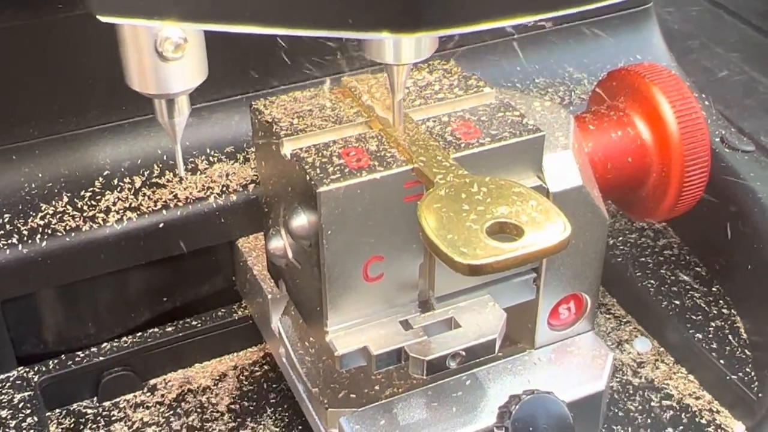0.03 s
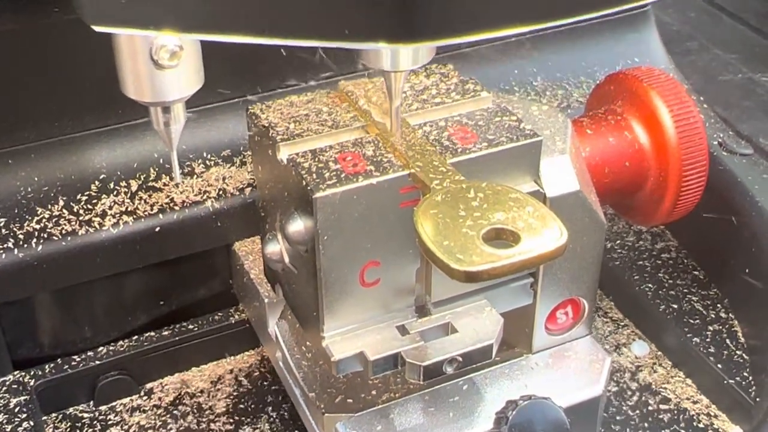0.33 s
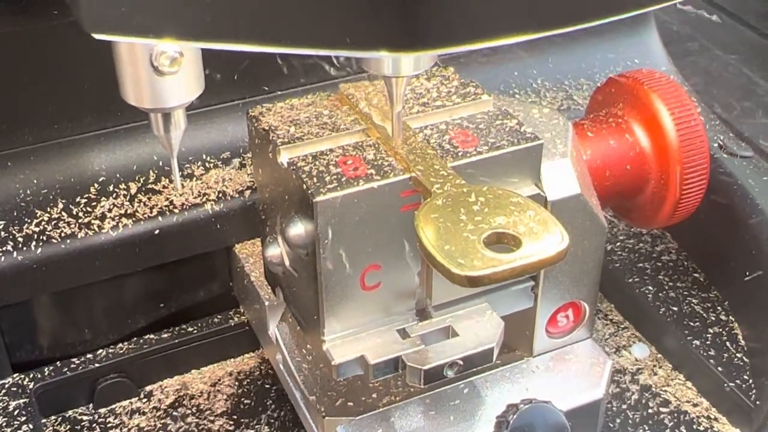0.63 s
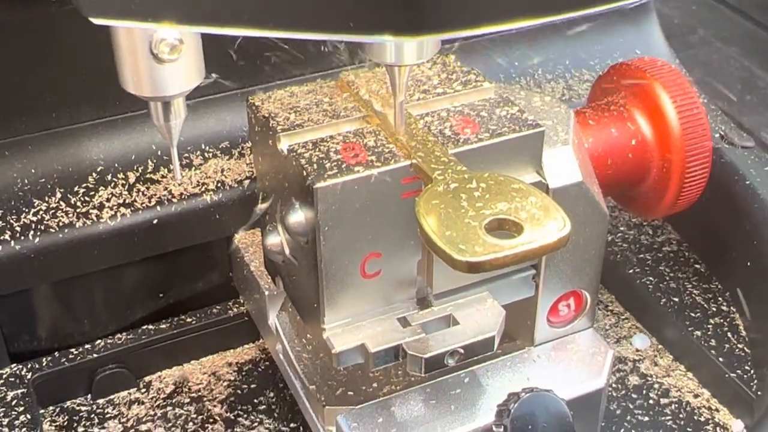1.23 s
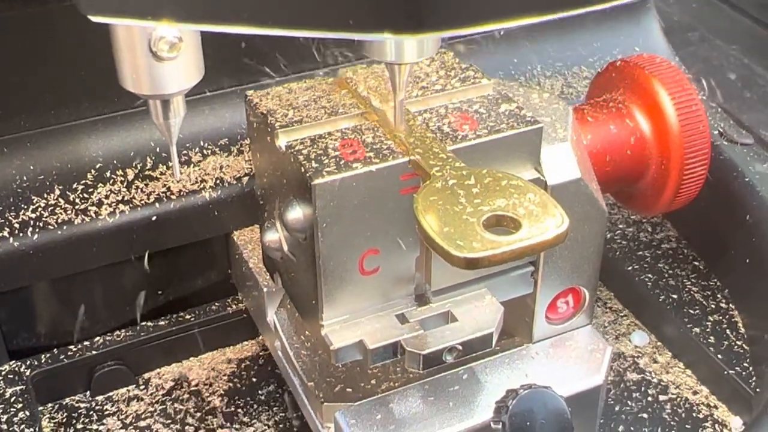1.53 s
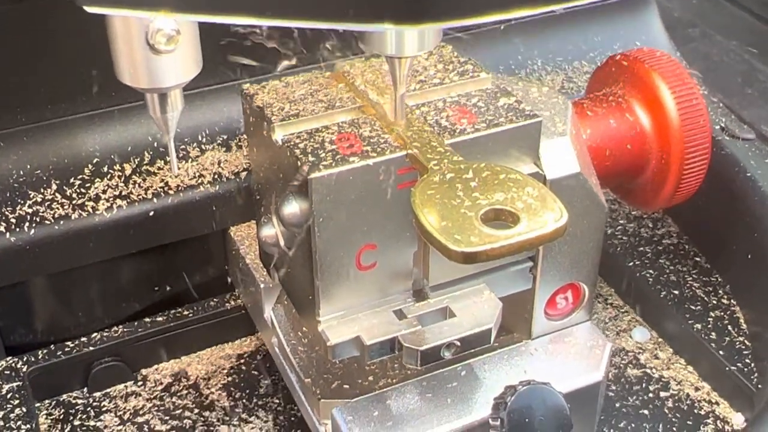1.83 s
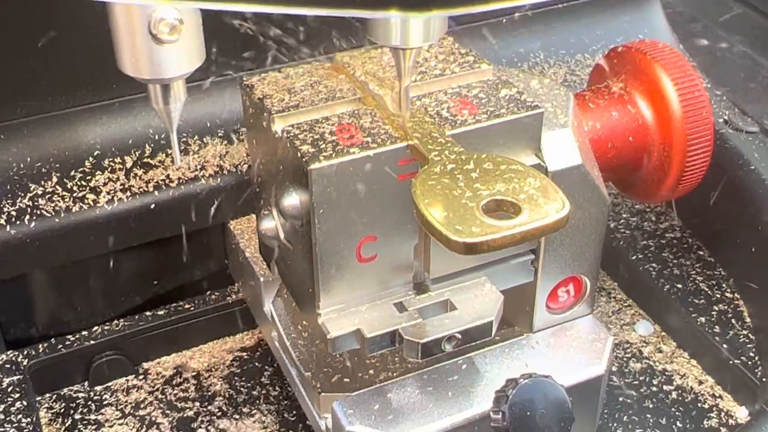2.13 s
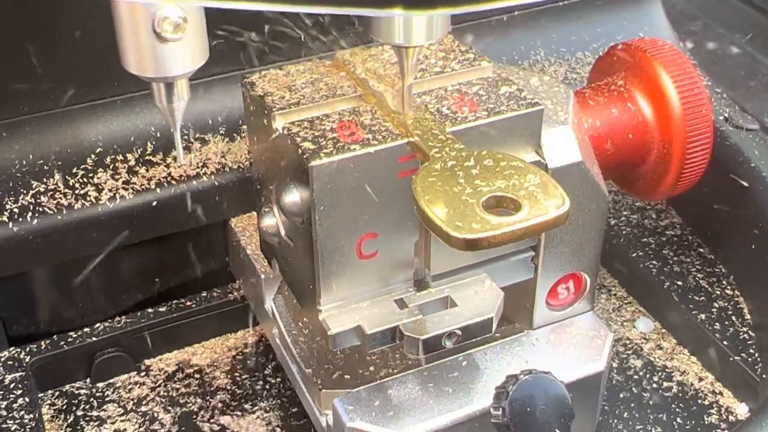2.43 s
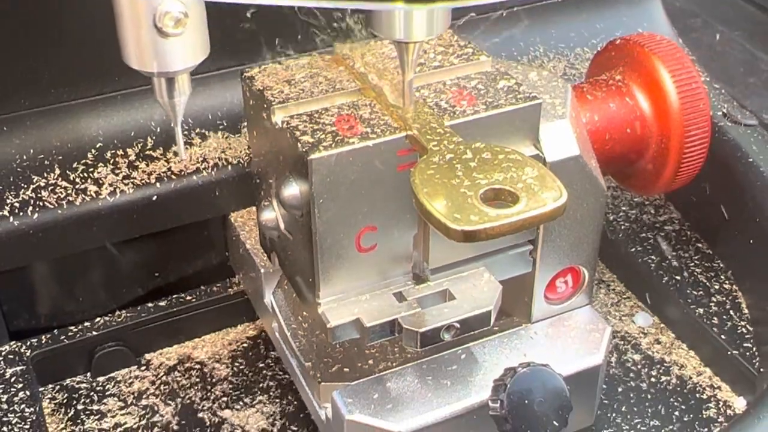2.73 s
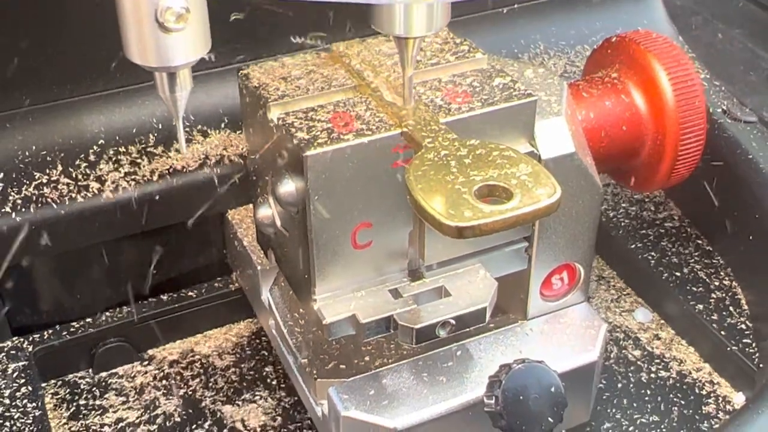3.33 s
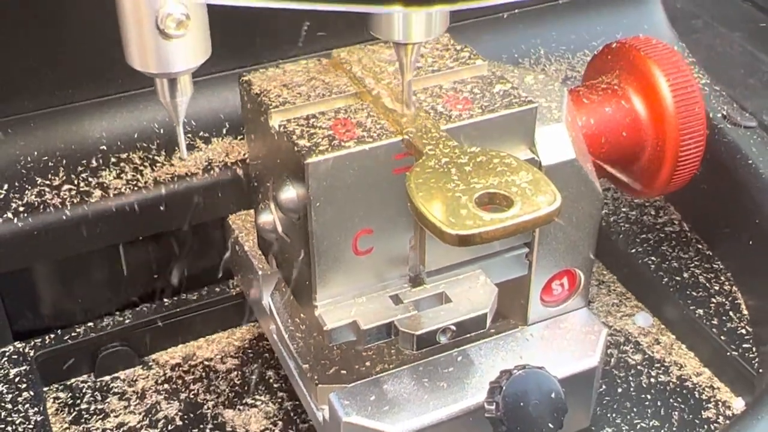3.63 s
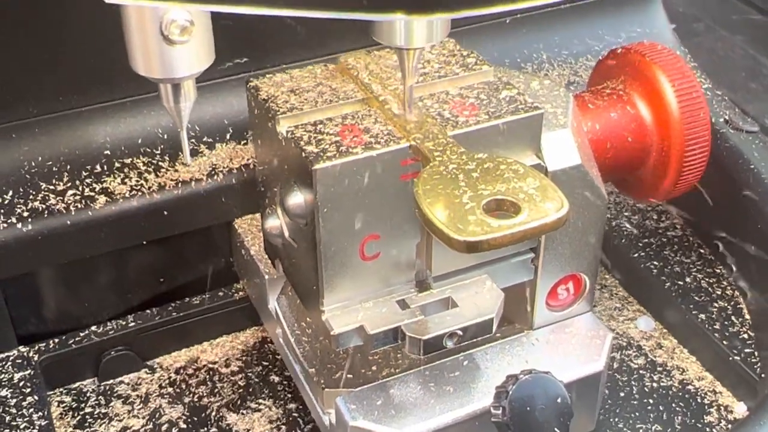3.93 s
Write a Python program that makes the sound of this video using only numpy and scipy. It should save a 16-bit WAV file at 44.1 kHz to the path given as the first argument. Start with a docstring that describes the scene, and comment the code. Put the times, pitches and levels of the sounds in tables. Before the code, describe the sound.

A key-cutting machine hums and grinds through brass, rattling briefly near the end.

```python
"""A key machine's four-flute cutter mills a brass key, heard up close.
The flutes scrape, whirl slowly in the groove, throw chips and make the metal squeal and whistle.
Near the end of the cut the tool groans, whirls faster, chatters in short bursts with one hard catch,
then runs almost free. Underneath sit the spindle's hum, the motor's air and the wash of the shop."""
import sys
import numpy as np
from scipy import signal
from scipy.fft import rfft, irfft
from scipy.io import wavfile
from scipy.ndimage import uniform_filter1d

SR = 44100
rng = np.random.default_rng(int(sys.argv[2]) if len(sys.argv) > 2 else 0)


def dump_mix(stems):
    """Bounce the given channels to the path in sys.argv[1] as a 16-bit WAV at rate SR."""
    frames = np.atleast_2d(stems).T  # one column per channel
    limited = np.clip(frames, -1, 1)  # hard clip at full scale
    pcm = np.round(limited * 32767).astype(np.int16)
    wavfile.write(sys.argv[1], SR, pcm)


N = 176400

# Spindle speed: time_s, speed_hz
SPINDLE_SPEED = [(0, 231.9), (2.0, 231.7), (2.85, 232.0), (3.25, 232.7), (3.42, 234.1), (4, 233.6)]
# Load on the cutter, heard as the level of its whine: time_s, level_db
CUTTER_LOAD = [(0, -34), (0.6, -35.5), (1.2, -34), (1.6, -37), (2.8, -36.5)]
# Whine under load: spin_multiple, whirl_multiple, relative_db
WHINE_TONES = [(1, 2, -16), (2, 0, -14), (4, 3, -17.5), (8, -1, -4.5), (8, 0, 0), (8, 1, -13), (9, -1, -18),
               (10, -1, -18), (10, 0, -11), (11, 0, -13.5), (13, -1, -16)]
# Surges where the cutter digs deeper: centre_s, half_width_s, gain_db
SURGES = [(0.23, 0.015, 4.5), (0.65, 0.013, 3), (0.822, 0.018, 7), (1.58, 0.042, 3), (1.78, 0.07, 5),
          (2.14, 0.025, 2)]
# Stretches of carriage travel: start_s, third_harmonic_db, fourth_harmonic_db, feed_db, drag_0_to_1
TRAVEL = [(0, -42, -39, -41, 0.35), (0.17, -49, -40, -41.5, 0.86), (0.97, -40, -37.5, -39.5, .02),
          (1.54, -47, -34, -41, 0.98), (1.88, -54, -34, -38.5, 0.9), (2.31, -40.5, -37.5, -43, 0.06),
          (2.74, -43, -35, -38, 0.82), (2.9, -31.5, -33, -38.5, 0.95), (3.071, -22.5, -36, -35, 0.6),
          (3.215, -30.5, -35.5, -39, 0.8), (3.34, -33.5, -33.5, -60, 0.2), (3.66, -34.5, -31.5, -58, 0.2)]
# Colour of the flutes' scrape: frequency_hz, relative_db
SCRAPE_EQ = [(40, -27.5), (200, 0), (830, -7), (1000, -1.5), (1250, -19.5), (1650, -13.5), (1830, 11.5),
             (2050, -6), (2350, 2), (2950, -4.5), (3400, -29), (16000, -47.5)]
# Swells of the frame's ring: time_s, level_db
FRAME_LEVEL = [(1.12, -34.5), (1.47, -34.5), (1.6, -30), (1.73, -42), (1.87, -29.5), (2.02, -39),
               (2.19, -33), (2.85, -34.5), (2.95, -46)]
# Colour of the feed's buzz: frequency_hz, relative_db
FEED_EQ = [(100, -21.5), (285, 1.5), (600, 0.5), (740, 8.5), (830, -18), (1030, 1.5), (1400, -9),
           (8000, -46.5)]
# Colour of tearing brass and chips: frequency_hz, relative_db
SWARF_EQ = [(1500, -18.5), (4650, -2.5), (5100, -13), (6300, 4.5), (7100, -12), (8200, -6), (11250, 6.5),
            (12900, -0.5), (15400, 5.5)]
# Shaking of the clamp: time_s, level_db
SHAKE_LEVEL = [(2.8, -53), (3.08, -38), (3.2, -31), (3.288, -23), (3.624, -25), (3.646, -26.5), (3.97, -30)]
# Colour of the clamp's rumble: frequency_hz, relative_db
RUMBLE_EQ = [(35, -64), (135, -18), (200, -14), (295, -1.5), (495, -8), (574, -16.5), (703, -9.5),
             (9000, -44.5)]
# Judder within the shaking: spin_multiple, whirl_multiple, relative_db
JUDDER_TONES = [(0, 3, -6), (2, 0, -11), (1, 2, -5), (4, 1, -11), (5, 1, -19), (8, 3, -15), (12, 3, -20)]
# Bursts of chatter: start_s, length_s, level_db
BURSTS = [(3.238, 0.01, -29), (3.269, 0.01, -23.5), (3.292, 0.0054, -17), (3.302, 0.0056, -24),
          (3.314, 0.024, -29.5), (3.383, 0.038, -25), (3.441, 0.018, -24), (3.465, 0.0066, -21),
          (3.496, 0.012, -25), (3.516, 0.014, -24), (3.558, 0.039, -24.5), (3.601, 0.029, -30.5),
          (3.675, 0.012, -33)]
# Colour of their crunch: frequency_hz, relative_db
CRUNCH_EQ = [(100, -7), (400, 17.5), (900, -3.5), (2200, 10), (2900, -0.5), (3200, 8.5), (3700, -5),
             (5200, -6.5), (6700, 0.5), (15500, -11)]
# Fading rubs after the chatter: start_s, length_s, level_db
RUBS = [(3.657, 0.029, -35), (3.714, .026, -32), (3.763, 0.023, -37), (3.808, .013, -33.5),
        (3.845, 0.014, -35), (3.88, 0.011, -39)]
# Ring of the rubbed clamp: frequency_hz, relative_db
RUB_EQ = [(1500, -16), (1900, -5), (2120, 5), (2400, -10), (2950, -8), (3200, -1), (3500, -30), (6000, -30),
          (12000, -32)]
# Steady tones of the fast whirl, through the chatter and after: spin_multiple, whirl_multiple, level_db
STEADY_CHATTER_TONES = [(4, 1, -39), (5, 0, -45), (8, 0, -38.5), (8, 1, -44), (9, 0, -39)]
# Modes of the knocked clamp: pitch_hz, relative_db, t60_s
CLAMP_MODES = [(367, -7, 0.093), (691, 5, 0.11), (1320, -14, .04), (1760, 2.5, 0.053), (2400, -6, 0.033)]
# Growl at full drag: spin_multiple, whirl_multiple, level_db
GROWL_TONES = [(3, 1, -43.5), (4, 1, -47.5), (5, -1, -57.5), (8, 1, -45), (10, -1, -45)]
# Groan before the chatter: time_s, level_db
GROAN_LEVEL = [(2.85, -58), (2.94, -34.5), (3.05, -40), (3.08, -28), (3.19, -32.5), (3.25, -38),
               (3.33, -51)]
# Pitched body of the groan: spin_multiple, whirl_multiple, relative_db
GROAN_TONES = [(1, 1, 0), (2, 0, -9.5), (2, 1, -9), (3, 1, -12), (5, 0, -11), (8, 0, -3.5)]
# Colour of the groan's rasp: frequency_hz, relative_db
RASP_EQ = [(60, -19), (140, -9), (220, 7), (370, -4), (510, 5), (620, -9), (740, 6), (860, -21), (1080, -6),
           (1500, -15), (2000, -1), (2700, -6.5), (3400, -23), (9000, -42)]
# Envelope of the high squeal: time_s, relative_db
SQUEAL_LEVEL = [(0, -55), (0.25, -46), (1.5, -35), (1.6, -40), (2.7, -30.5), (2.92, -40), (3.3, -51)]
# Squeal partials, spaced at twice the spindle rate: pitch_hz, relative_db
SQUEAL_PARTIALS = [(13820, -17), (14283, -14), (14746, -5.5), (15210, -3), (15673, -12)]
# Spells of whistling: start_s, end_s, relative_db
WHISTLES = [(0, 0.8, -53.5), (0.85, 1.28, -52.5), (1.287, 1.534, -50.5), (1.846, 1.998, -50.5),
            (2.176, 2.436, -51), (2.437, 2.75, -50.5)]
# Whistle partials, one flute rate apart: pitch_hz, relative_db
WHISTLE_PARTIALS = [(4584, -11), (5511, -10), (6438, -5.5), (7364, -7), (8291, 3.5), (9218, -3.5)]
# Fundamental of the spindle's hum: time_s, level_db
HUM_LEVEL = [(0.05, -18.5), (2.86, -18.5), (3.32, -21.5), (3.34, -24), (3.49, -26), (3.95, -21.5)]
# Colour of the motor's air: frequency_hz, relative_db
AIR_EQ = [(30, -69), (55, -3), (400, 2.5), (1400, -8), (2200, 4.5), (5000, -16), (6500, -10), (15500, -14)]
# Colour of the shop's wash: frequency_hz, relative_db
ROOM_EQ = [(40, -17), (200, 10.5), (700, 4), (1200, 5.5), (1900, 11), (2400, 3), (4000, -26), (16000, -56)]
# Phase between the two microphone ports: frequency_hz, left_lead_rad
PORT_PHASE = [(0, 0), (750, .5), (930, -.4), (1290, 1.1), (1600, 0), (1730, 2.2), (1797, .8), (1855, -.7),
              (1950, -.6), (2100, 0), (8900, 0), (9150, -1.4), (9800, -3.1), (10550, -3.2), (11750, -6.3),
              (12350, -6.3), (13200, -9.3), (14100, -9.5), (15250, -12.2), (15800, -12.6)]
# Balance between the ports: frequency_hz, left_minus_right_db
PORT_BALANCE = [(100, .6), (400, .7), (780, 2), (930, 7.5), (1150, 3), (1600, 4), (1810, -3.5), (2200, 0)]

FLUTES, TURNS_PER_WHIRL = 4, 4
DRAG_WHIRL_HZ, CHATTER_WHIRL_HZ = 37.5, 126.5


def milling(spin, whirl, scrape_db=-36.5, frame_hz=284):
    """Flutes bite the brass: a scrape and a whine, both rougher under drag, over the frame's ring."""
    rough = drag()
    surge_db = sum(db * np.exp(-((clock() - at) / width) ** 2) for at, width, db in SURGES)
    grain = clatter(whirl, grit=.35 + .5 * rough)
    grain *= bites(spin, sharp=.12) * bites(FLUTES * spin, sharp=.63) * bites(whirl, sharp=.12)
    scrape = colour(grain, SCRAPE_EQ) * undb(scrape_db + .84 * surge_db + 2 * rough + 1.4 * drift(25.76))
    frame = np.sqrt(2) * undb(curve(FRAME_LEVEL)) * np.sin(turning(frame_hz + 3.3 * drift(30.66)))
    sway = (.1 + .43 * rough) * drift(40.27) / (2 * FLUTES)
    whine_db = curve(CUTTER_LOAD) + surge_db + .8 * (1 + rough) * drift(29.82)
    whine = undb(whine_db) * tones(WHINE_TONES, spin + sway, whirl)
    return (scrape + frame) * fade(3.37, .15) + whine * fade(2.93, .34)


def feed(whirl):
    """The cutter buzzes at its whirl rate while the carriage presses the key into it."""
    level_db = travel(column=3) + 2.4 * drift(22.07)
    return undb(level_db) * colour(clatter(whirl, grit=.5), FEED_EQ)


def swarf(spin, whirl, hiss_db=-41.5, chips_db=-39.5, chips_per_s=500):
    """Tearing brass hisses, pulsing twice a turn, and flying chips tick."""
    tearing = clatter(whirl, grit=.85)
    tearing *= bites(2 * spin, sharp=.22) * bites(spin, sharp=.11) * bites(whirl, sharp=.28)
    sizes = undb(2.5 * np.minimum(rng.exponential(size=N), 4))
    ticks = (rng.random(N) < chips_per_s / SR) * sizes
    hiss = undb(hiss_db + 2 * drift(28)) * colour(tearing, SWARF_EQ)
    chips = undb(chips_db) * colour(ticks, SWARF_EQ)
    return (hiss + chips) * fade(3.16, .66)


def chatter(spin, whirl, rumble_db=-2.5):
    """The fast-whirling tool drones, shakes the clamp, hammers the key in bursts, then rubs."""
    rattle = clatter(whirl, grit=.6, harmonics=174) * bites(whirl, sharp=.57) * bites(spin, sharp=.73)
    rumble = undb(rumble_db) * colour(rattle, RUMBLE_EQ) * (1 - fade(2.7, .25))
    judder = tones(JUDDER_TONES, spin, whirl) * (1 - fade(3.23, .095))
    judder *= .39 + .61 * fade(3.64, .025)  # eases off as the bursts end
    shaking = undb(curve(SHAKE_LEVEL)) * (rumble + judder)
    blows = rng.standard_normal(N) * bites(FLUTES * spin, sharp=.9) * bites(whirl, sharp=.084)
    blows *= undb(1.6 * drift(600))
    crunch = contacts(BURSTS) * colour(blows, CRUNCH_EQ)
    rubs = contacts(RUBS) * colour(blows, RUB_EQ)
    steady = tones(STEADY_CHATTER_TONES, spin, whirl) * (1 - fade(3.23, .1))
    return shaking + crunch + rubs + steady


def knock(start_s=3.2935, level_db=-21):
    """One hard catch of the cutter rings the clamp."""
    age = np.maximum(clock() - start_s, 0)
    ring = 0
    for hz, db, t60 in CLAMP_MODES:
        envelope = np.minimum(age * hz, 1) * np.exp(-np.log(1000) * age / t60)
        ring += undb(db) * envelope * np.cos(2 * np.pi * hz * age)
    return undb(level_db) * ring


def dragging(spin, whirl, rasp_db=-2):
    """The cutter growls along the groove's wall and builds to a rough groan before the chatter."""
    growl = drag() * tones(GROWL_TONES, spin, whirl)
    grain = clatter(whirl, grit=.5, harmonics=300) * bites(whirl, sharp=.36) * bites(spin, sharp=.31)
    groan = tones(GROAN_TONES, spin, whirl) + undb(rasp_db) * colour(grain, RASP_EQ)
    return growl + undb(curve(GROAN_LEVEL)) * groan


def metal_ring(partials, level_db, whirl):
    """A ring renewed by the flutes; its partials waver together, more so under drag."""
    waver = (.62 + .6 * drag()) * (drift(39.5) + .5 * drift(400)) + 2 * drift(4.2)
    ring = sum(undb(db) * np.sin(2 * np.pi * hz * clock() + waver) for hz, db in partials)
    return np.sqrt(2) * ring * undb(level_db + 1.4 * drift(45.57)) * bites(whirl, sharp=.31)


def squeal(whirl, trim_db=1.5):
    """The metal's highest ring swells through the cut and fades at its end."""
    return metal_ring(SQUEAL_PARTIALS, curve(SQUEAL_LEVEL) + trim_db, whirl) * fade(3.27, .35)


def whistle(whirl, trim_db=2.5):
    """A lower ring of the metal, faint throughout the cut and louder in spells."""
    t = clock()
    level_db = -75 + 20 * fade(2.92, .06)
    for start, end, db in WHISTLES:
        level_db[(t > start) & (t <= end)] = db
    return metal_ring(WHISTLE_PARTIALS, uniform_filter1d(level_db, size=600) + trim_db, whirl)


def hum(spin, flicker_db=1.02, waver_rad=.051):
    """The spindle's clean fundamental, with two harmonics that change as the carriage travels."""
    sound = undb(curve(HUM_LEVEL)) * np.sin(spin)
    for column, harmonic in ((1, 3), (2, 4)):
        gain = undb(travel(column) + flicker_db * drift(30))
        sound += gain * np.sin(harmonic * spin + waver_rad * drift(30))
    return np.sqrt(2) * sound


def motor_air(level_db=-40):
    """A steady bed of rushing air from the motor."""
    return undb(level_db) * colour(rng.standard_normal(N), AIR_EQ)


def room(level_db=-44):
    """The machine's diffuse wash in the shop: steady noise, unrelated left and right."""
    return undb(level_db) * np.array([colour(rng.standard_normal(N), ROOM_EQ) for _ in range(2)])


def travel(column):
    """One column of TRAVEL, held through each stretch with a quick glide between."""
    rows = np.array(TRAVEL)
    stretch = np.searchsorted(rows[:, 0], clock(), side="right") - 1
    return uniform_filter1d(rows[stretch, column], int(.0067 * SR))


def drag():
    """How hard the cutter drags along the groove's wall, 0-1."""
    return travel(column=4)


def tones(table, spin, whirl, flicker_db=1.6, waver_rad=.28):
    """Spindle harmonics and whirl sidebands, each a little unsteady."""
    sound = 0
    for turns, whirls, db in table:
        angle = turns * spin + whirls * whirl + 2 * np.pi * rng.random()
        sound += undb(db + flicker_db * drift(25.05)) * np.sin(angle + waver_rad * drift(30.2))
    return np.sqrt(2) * sound


def clatter(angle, grit, harmonics=380):
    """A rough texture that loops once a turn, blended with fresh noise by grit (0-1)."""
    shape = irfft(np.r_[0, np.exp(2j * np.pi * rng.random(harmonics))], 16 * harmonics)
    loop = np.interp(angle / (2 * np.pi) % 1, np.linspace(0, 1, len(shape)), shape)
    return np.sqrt(1 - grit ** 2) * unit(loop) + grit * rng.standard_normal(N)


def bites(angle, sharp):
    """A smooth pulse once a turn."""
    return unit(np.exp(sharp * np.cos(angle)))


def contacts(table, attack_s=.0038, decay_s=.0077):
    """Envelope of brief contacts: each rises, holds and dies away."""
    t, envelope = clock(), 0
    for start, length, db in table:
        rise = np.clip((t - start) / attack_s, 0, 1)
        envelope += undb(db) * rise * np.exp(-np.maximum(t - start - length, 0) / decay_s)
    return envelope


def colour(x, eq):
    """Minimum-phase EQ; the result has rms 1."""
    hz, db = np.array(eq).T
    f = np.arange(N // 2 + 1) * SR / N
    gain = undb(np.interp(np.log(f + 1), np.log(hz), db))
    cepstrum = irfft(np.log(gain), N)
    cepstrum[1:N // 2] *= 2
    cepstrum[N // 2 + 1:] = 0
    return unit(irfft(rfft(x) * np.exp(rfft(cepstrum)), N))


def drift(rate_hz):
    """Smooth random modulation at rms 1."""
    hold = int(SR / rate_hz)
    steps = np.repeat(rng.standard_normal(N // hold + 2), hold)
    return unit(uniform_filter1d(uniform_filter1d(steps, hold), hold)[:N])


def fade(centre_s, length_s):
    """A smooth fade from 1 to 0."""
    return .5 - .5 * np.sin(np.pi * np.clip((clock() - centre_s) / length_s, -.5, .5))


def curve(table):
    """Straight ramps between breakpoints in time."""
    return np.interp(clock(), *np.array(table).T)


def turning(hz):
    """Running angle in radians."""
    return 2 * np.pi * np.cumsum(hz) / SR


def clock():
    """Time in seconds."""
    return np.arange(N) / SR


def undb(db):
    """Decibels to gain."""
    return 10 ** (np.asarray(db) / 20)


def unit(x):
    """Scale to rms 1."""
    return x / np.sqrt(np.mean(x ** 2))


def stereo_ports(mono):
    """Two microphone ports hear each frequency with their own phase and level."""
    f = np.arange(N // 2 + 1) * SR / N
    lead = np.interp(f, *np.array(PORT_PHASE).T)
    balance_db = np.interp(f, *np.array(PORT_BALANCE).T)
    left = undb(balance_db / 2) * np.exp(.5j * lead)
    return irfft(rfft(mono) * np.array([left, 1 / left]), N)


def scene():
    """One spindle and three rates of whirl drive the machine, spread to stereo over the shop's wash."""
    spin = turning(curve(SPINDLE_SPEED) + .1486 * drift(12))
    cut_whirl = spin / TURNS_PER_WHIRL + .037 * (.11 + drag()) * drift(15)  # slips more under drag
    chatter_whirl = turning(CHATTER_WHIRL_HZ + .704 * drift(20))
    machine = hum(spin) + feed(cut_whirl) + milling(spin, cut_whirl) + swarf(spin, cut_whirl)
    machine += chatter(spin, chatter_whirl) + knock()
    drag_whirl = turning(DRAG_WHIRL_HZ + 1.5 * drift(20))
    machine += dragging(spin, drag_whirl) + squeal(cut_whirl) + whistle(cut_whirl) + motor_air()
    return stereo_ports(machine) + room()


def record(dry):
    """A steep low-pass trims the very top."""
    cutoff_hz = 15850
    return signal.sosfilt(signal.ellip(12, .2, 80, cutoff_hz, fs=SR, output="sos"), dry)


dry = scene()
out = record(dry)
dump_mix(out)
```